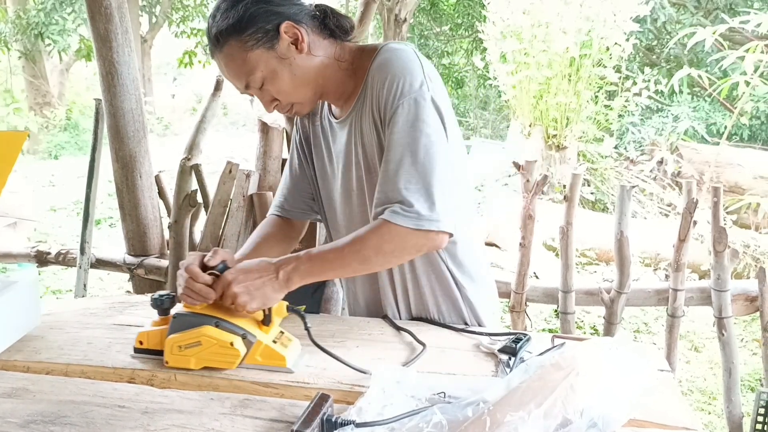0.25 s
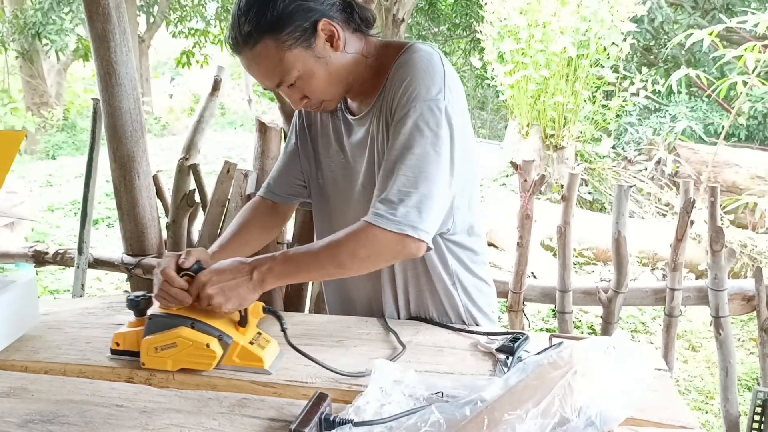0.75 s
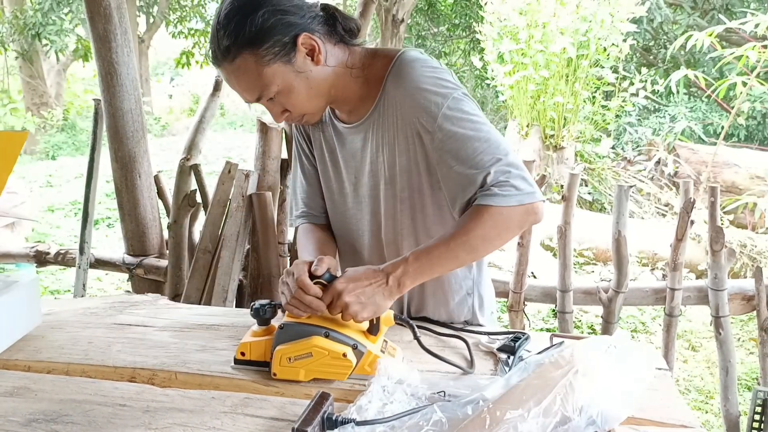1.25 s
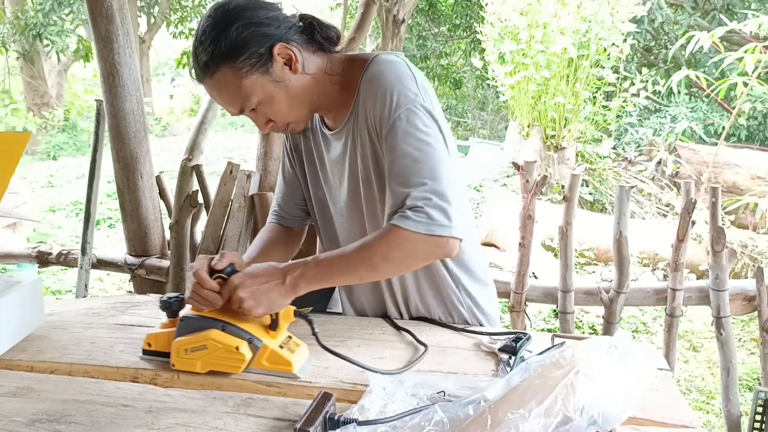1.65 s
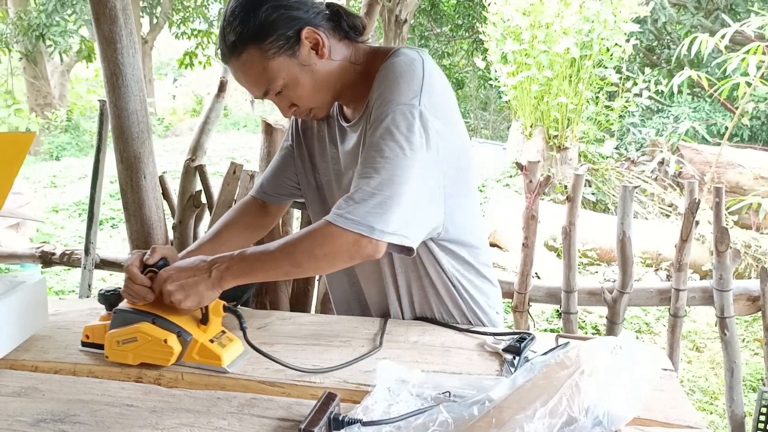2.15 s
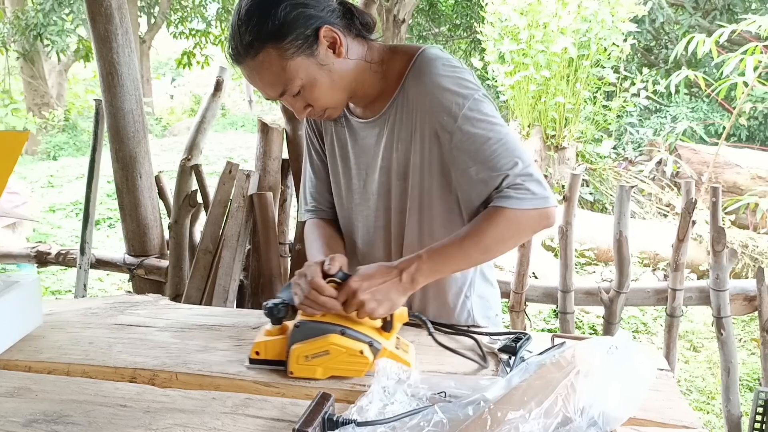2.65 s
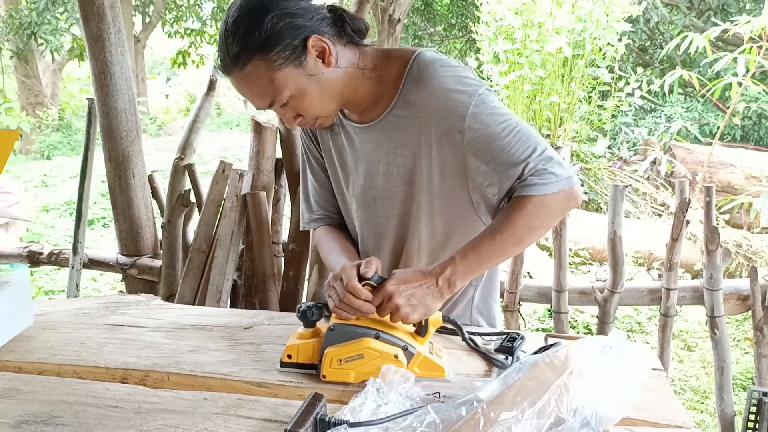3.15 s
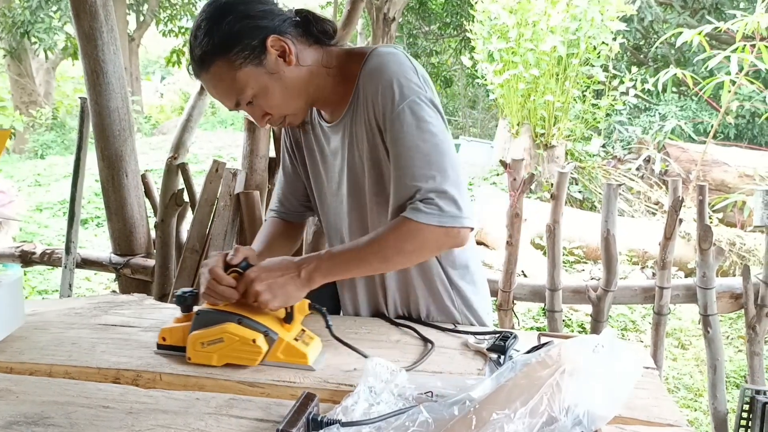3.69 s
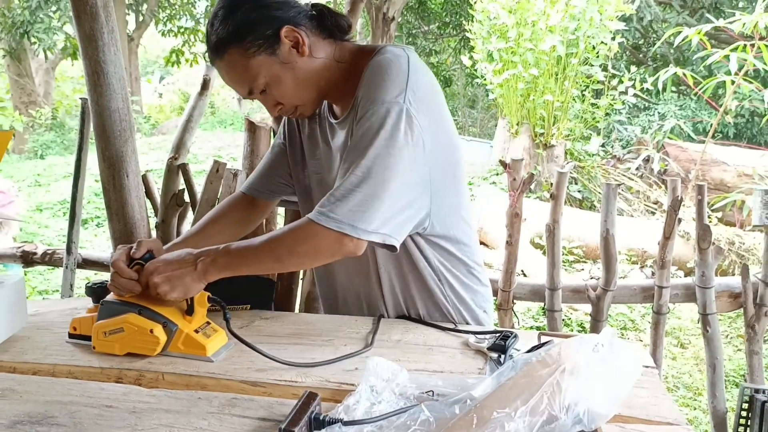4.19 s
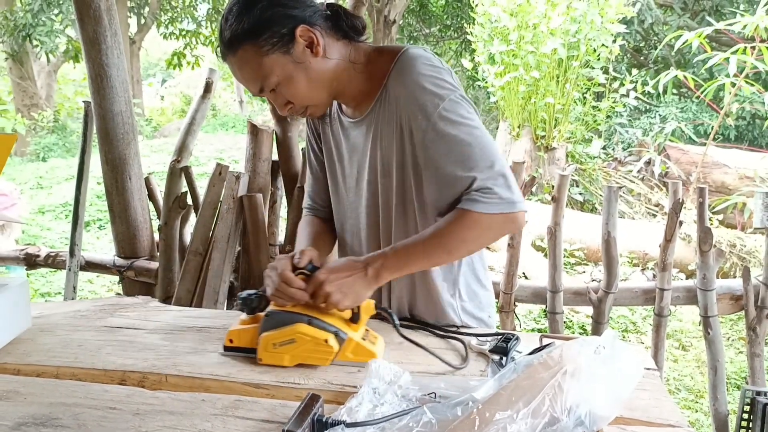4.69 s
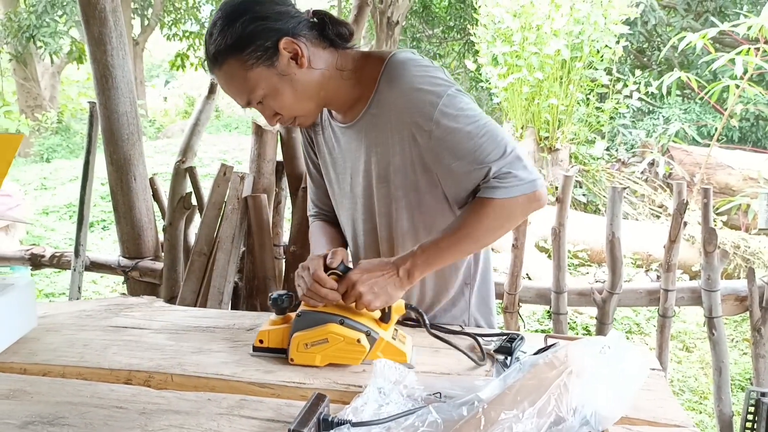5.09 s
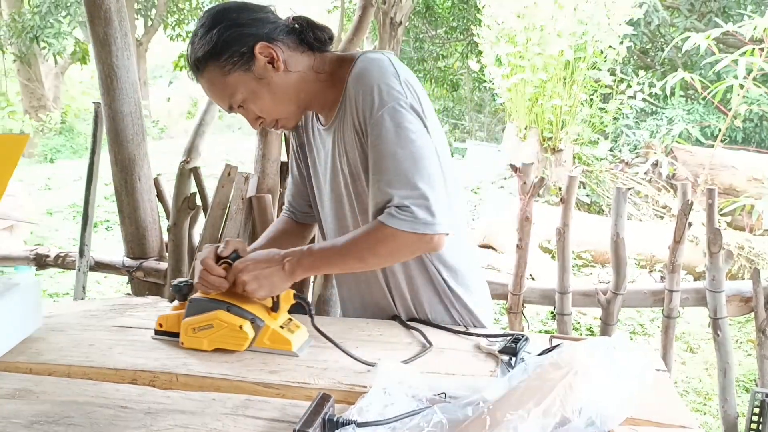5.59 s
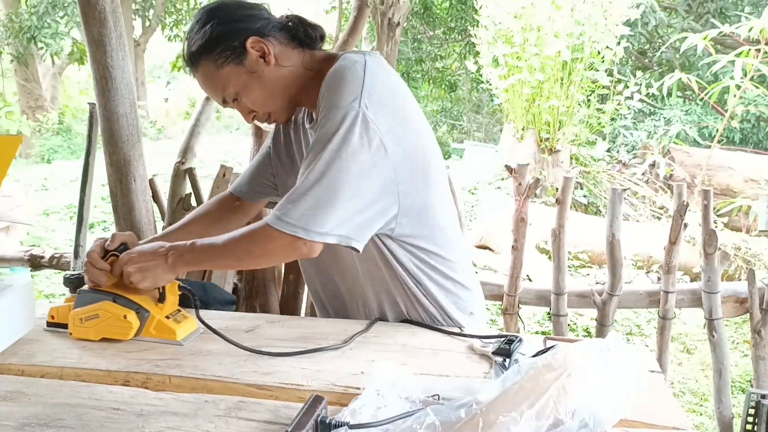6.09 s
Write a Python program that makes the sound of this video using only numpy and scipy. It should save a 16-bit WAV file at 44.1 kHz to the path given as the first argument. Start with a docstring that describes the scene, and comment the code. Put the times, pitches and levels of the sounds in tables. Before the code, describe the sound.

An electric hand planer runs steadily with a loud, high whine and rushing hiss as it slides back and forth over a wooden board.

```python
"""An electric hand planer is already running, pushed to and fro over a thick board under an open shed.
From the start its two-blade drum, faster motor, belt and a rattling part whine at locked speeds over
rushing air and chips. As the strokes go on, shifting echoes make the tones swell and fade, and the
shaken board hums. Just after six seconds the trigger is let go and the pitch starts to drop."""
import sys
import numpy as np
from scipy import signal
from scipy.fft import rfft, irfft
from scipy.io import wavfile
from scipy.ndimage import uniform_filter1d

SR = 44100
rng = np.random.default_rng(int(sys.argv[2]) if len(sys.argv) > 2 else 0)


def output_pcm(signal):
    """Save a mono or channel-first signal as 16-bit PCM at the path in sys.argv[1].

    Samples are clipped to [-1, 1] before scaling.
    """
    pcm = np.clip(np.atleast_2d(signal).T, -1, 1) * 32767
    wavfile.write(sys.argv[1], SR, np.round(pcm).astype(np.int16))


N = 279373
MOTOR_RATIO, RATTLE_RATIO, BELT_RATIO = 1.7864, .9818, .5201  # turns for each turn of the drum


def gain_of(db):
    """Turns decibels into a number to multiply by."""
    return 10 ** (np.asarray(db) / 20)


def evened(x):
    """Scales a signal to an average power of 1."""
    return x / np.sqrt(np.mean(abs(x) ** 2) + 1e-20)


def curves(rows, t):
    """Reads a table's columns at times t; the first column holds the times."""
    times, *columns = np.transpose(rows)
    return [np.interp(t, times, column) for column in columns]


def flutter(hz, count):
    """Random complex wobbles, mostly slower than hz, with one value every 32 samples."""
    steps = N // 32 + 2
    noise = rng.standard_normal((count, steps)) + 1j * rng.standard_normal((count, steps))
    rates = np.fft.fftfreq(steps, 32 / SR)
    wobbles = np.fft.ifft(np.fft.fft(noise) / (1 + abs(rates / hz) ** 3))
    return np.array([evened(row) for row in wobbles])


def tones(turns, orders, levels_db, fade, fade_hz, blur, blur_hz):
    """Tones that echoes fade and shaking parts blur. An order is a number of waves per turn."""
    fade = np.clip(fade * np.sqrt(orders / 8), 0, 1)[:, None]  # short waves fade more
    slow, quick = flutter(fade_hz, len(orders)), flutter(blur_hz, len(orders))
    shapes = np.sqrt(1 - fade ** 2) + fade * slow + blur * quick
    steps, out = np.arange(N) / 32, np.zeros(N)
    for order, db, shape in zip(orders, levels_db, shapes):
        size = np.interp(steps, np.arange(len(shape)), shape) * np.exp(2j * np.pi * rng.random())
        angle = 2 * np.pi * (order * turns % 1)
        out += np.sqrt(2) * gain_of(db) * (size * np.exp(1j * angle)).real
    return out


# The hum's low notes; the loudest, at 285.6 Hz, comes from the rattling part's turning. Each row: pitch in Hz,
# width in Hz, relative level in dB.
HUM_NOTES = [(156, 6.6, -30), (225.6, 18, -8.5), (285.6, 12, 5)]
# Brief swells of the hum. Each row: start in seconds, length in seconds, level in dB.
HUM_SWELLS = [(0.04, 0.091, -31), (0.206, 0.065, -33), (0.337, 0.19, -34), (0.682, 0.034, -30),
              (1.122, 0.056, -33), (1.4, 0.22, -31.5), (1.695, 0.032, -41), (1.829, 0.12, -33),
              (3.611, 0.052, -34), (3.712, 0.16, -33), (3.932, 0.18, -33), (4.41, 0.048, -37),
              (5.706, 0.051, -34), (6.05, 0.14, -34)]

def board_hum(t):
    """The shaken board rings at its low notes, joined by the rattling part's low tone, and swells now and then."""
    hz = np.fft.rfftfreq(N, 1 / SR)
    peaks = sum(gain_of(db) / (1 + (2 * (hz - pitch) / width) ** 2) for pitch, width, db in HUM_NOTES)
    hum = evened(irfft(rfft(rng.standard_normal(N)) * peaks, N))
    lumps = evened(flutter(hz=7.8, count=1)[0].real)
    level = gain_of(-45.5 + 0.5 * np.interp(t * SR / 32, np.arange(len(lumps)), lumps))
    for start, length, db in HUM_SWELLS:
        level += gain_of(db) * np.exp(-(2 * (t - start) / length - 1) ** 2)
    return level * hum


# The colour of the rushing air. Each row: frequency in Hz, level in dB per Hz.
RUSH_COLOUR = [(70, -108), (200, -74), (420, -62), (1250, -60), (1700, -55.5), (2900, -52), (3300, -54),
               (4200, -54.5), (4800, -59.5), (6300, -60), (7200, -72), (11000, -83), (13800, -79),
               (14800, -69)]
# Where the rush's middle, upper and top bands lie, in Hz.
BAND_HZ = [3260, 5000, 13000]
# Each row: time in seconds, then the three bands in dB. Only swings around a band's average count.
BAND_SWINGS = [(0.0, -21, -24, -46), (0.02, -18, -22.5, -38), (0.79, -23, -25, -41),
               (1.18, -18.5, -22.5, -38), (1.62, -19.5, -22.5, -40), (1.89, -23.5, -23.5, -41),
               (2.31, -21.5, -26.5, -39.5), (2.75, -19, -21, -39), (3.0, -20, -23, -41),
               (3.21, -23, -25, -43), (3.45, -19.5, -22.5, -38), (3.68, -19, -22, -38.5),
               (3.97, -21, -26, -38.5), (4.42, -21.5, -27, -37), (4.44, -22, -26.5, -40),
               (5.2, -20, -23.5, -38), (5.55, -22, -25, -40), (6.08, -21, -24.5, -35),
               (6.29, -20, -25.5, -36), (6.33, -14, -22, -33)]

def air_rush(turns):
    """Air and chips hiss in drifting patches, lightly chopped by each motor turn and each rattle."""
    frames, hz = N // 256 + 5, np.fft.rfftfreq(1024, 1 / SR)
    real, imag, patches = rng.standard_normal((frames, 513, 3)).T
    patches = evened(uniform_filter1d(uniform_filter1d(patches, 14, 0), 12, 1))
    gusts = evened(uniform_filter1d(rng.standard_normal(frames), 6))
    bands_db = np.array(curves(BAND_SWINGS, np.arange(frames) * 256 / SR))
    blend = np.transpose([np.interp(hz, BAND_HZ, row) for row in np.eye(len(BAND_HZ))])
    swing_db = blend @ (bands_db - bands_db.mean(axis=1, keepdims=True))
    point_hz, point_db = np.transpose(RUSH_COLOUR)
    colour_db = np.interp(np.log(hz + 1), np.log(point_hz), point_db)[:, None]
    spectrum = (real + 1j * imag) * gain_of(colour_db + swing_db + 1.9 * patches + 0.6 * gusts)
    noise = evened(signal.istft(spectrum, nperseg=1024, noverlap=768)[1][:N])
    level = np.sqrt(np.sum(gain_of(colour_db) ** 2) * hz[1])
    angle = 2 * np.pi * turns
    chop = 1 + 0.047 * np.cos(MOTOR_RATIO * angle) + 0.15 * np.cos(RATTLE_RATIO * angle)
    return level * noise * chop


# The belt's tones in waves per lap, then their levels in dB.
BELT_ORDERS = [1, 2, 5, 8, 10, 12, 13]
BELT_DB = [-66, -48, -44, -48, -42, -44, -34]

def belt_whine(turns):
    """The belt's sound repeats with every lap of its loop."""
    orders = BELT_RATIO * np.array(BELT_ORDERS)
    return tones(turns, orders, BELT_DB, fade=0.27, fade_hz=2.6, blur=0.14, blur_hz=31)


# The shaking tones, along with some plain drum, blade and motor tones. Each row: motor order, drum order. Then
# their levels in dB.
SHAKE_ORDERS = [(1, -1), (0, 1), (2, -1), (1, 1), (3, -2), (1, 2), (3, -1), (4, -2), (2, 2), (4, -1),
                (3, 1), (3, 2), (5, -1), (4, 1), (6, -2), (5, 0), (4, 2), (5, 1), (6, 0), (5, 2), (6, 1),
                (7, 0), (0, 16), (11, 0), (0, 20), (0, 22), (0, 24), (23, 0), (24, 0), (7, -3), (5, -2),
                (0, 3), (6, -1), (8, 0), (13, 0), (0, 30), (0, 32), (0, 38)]
SHAKE_DB = [-52, -48, -36, -35, -37, -44, -41, -41, -37, -41, -31.5, -40, -41, -31.5, -36, -31.5, -34, -33,
            -32.5, -37, -36, -36, -35, -41, -39, -42.5, -52.5, -65, -56, -41, -40, -48, -41, -41, -52, -59,
            -61, -69]

def shaking(turns):
    """Motor and drum shake each other, making tones at sums of their orders; plain higher blade and motor tones
    sound alongside."""
    orders = np.dot(SHAKE_ORDERS, [MOTOR_RATIO, 1])
    return tones(turns, orders, SHAKE_DB, fade=0.9, fade_hz=3.5, blur=0.21, blur_hz=21)


def housing_whine(turns):
    """More sums of motor and drum orders sound faintly where the housing rings easily."""
    pairs = [(motor, drum) for motor in range(2, 10) for drum in range(-4, 5)
             if drum and (motor, drum) not in SHAKE_ORDERS]
    orders = np.dot(pairs, [MOTOR_RATIO, 1])
    orders = orders[(orders > 5) & (orders < 16)]
    levels_db = -45 + 2.1 * rng.standard_normal(len(orders))
    return tones(turns, orders, levels_db, fade=0.39, fade_hz=2.3, blur=0.12, blur_hz=15)


# The rattle's tones. Each row: motor order, rattling part's order. Then their levels in dB.
RATTLE_ORDERS = [(4, -1), (3, 2), (4, 1), (4, 2), (5, 1), (5, 2), (6, 1), (5, 3), (6, 2), (7, 1), (7, 2),
                 (8, 1), (7, 3), (8, 2), (9, 2), (4, 3), (10, 2)]
RATTLE_DB = [-39, -40, -34, -36, -31, -32, -32, -36, -36, -31.5, -32, -40, -41, -42, -43, -36, -47]

def rattle(turns):
    """A part turning just slower than the drum beats with the motor."""
    orders = np.dot(RATTLE_ORDERS, [MOTOR_RATIO, RATTLE_RATIO])
    return tones(turns, orders, RATTLE_DB, fade=0.87, fade_hz=2.8, blur=0.064, blur_hz=19)


# How fast the drum spins. Each row: time in seconds, turns per second.
DRUM_SPEED = [(0, 290.5), (.42, 290.8), (.98, 290.8), (1.54, 290.9), (2.1, 291.2), (2.66, 291.2),
              (3.22, 291.1), (3.78, 291.2), (4.34, 291.6), (4.9, 291.6), (5.46, 291.4), (6.21, 292.0),
              (6.33, 279.5)]

def drum_speed(t):
    """The drum spins almost steadily until the trigger is let go."""
    return curves(DRUM_SPEED, t)[0]


# The strokes. Each row: time in seconds, place along the board in metres, then the extra metres
# travelled by each of five echoes off the shed, table and worker.
STROKES = [(0.0, 0.06, 0.919, 1.973, 0.925, 0.722, 0.907), (0.25, -0.06, 0.858, 1.955, 0.871, 0.776, 0.799),
           (0.5, -0.18, 0.933, 2.029, 0.856, 0.74, 0.742), (0.75, -0.17, 0.955, 2.065, 0.816, 0.75, 0.754),
           (1.0, 0.06, 0.888, 1.936, 0.793, 0.86, 0.866), (1.25, 0.12, 0.867, 1.853, 0.81, 0.818, 0.833),
           (1.5, 0.03, 0.899, 1.881, 0.827, 0.804, 0.822), (1.75, -0.11, 0.903, 1.914, 0.838, 0.72, 0.739),
           (2.0, -0.21, 0.957, 2.069, 0.848, 0.765, 0.771), (2.25, -0.14, 0.95, 2.086, 0.834, 0.772, 0.794),
           (2.5, 0.05, 0.904, 1.967, 0.861, 0.828, 0.809), (2.75, 0.21, 0.851, 1.844, 0.872, 0.867, 0.839),
           (3.0, 0.27, 0.889, 1.524, 0.84, 0.906, 0.903), (3.25, 0.2, 0.845, 1.897, 0.851, 0.757, 0.793),
           (3.5, 0.07, 0.958, 1.847, 0.865, 0.734, 0.857), (3.75, -0.05, 0.902, 1.87, 0.747, 0.789, 0.785),
           (4.0, -0.18, 0.915, 2.031, 0.796, 0.739, 0.745), (4.25, -0.2, 0.972, 2.147, 0.757, 0.711, 0.708),
           (4.5, -0.05, 0.944, 2.059, 0.728, 0.621, 0.632), (4.75, 0.13, 0.886, 1.957, 0.763, 0.737, 0.785),
           (5.0, 0.18, 0.968, 1.862, 0.772, 0.638, 0.734), (5.25, 0.1, 0.951, 1.908, 0.773, 0.658, 0.758),
           (5.5, -0.01, 0.892, 1.987, 0.705, 0.598, 0.764),
           (5.75, -0.11, 0.963, 2.051, 0.623, 0.586, 0.771),
           (6.0, -0.24, 1.044, 2.161, 0.686, 0.573, 0.703), (6.25, -0.26, 1.004, 2.14, 0.609, 0.643, 0.639)]

def stroke_levels(rows, orders, t):
    """Each tone's level in dB as the tool moves and its echoes add to it or cancel it."""
    rounding = round(0.2 * SR)  # smooths the strokes
    place, *paths = [uniform_filter1d(c, rounding, mode="nearest")[::64] for c in curves(STROKES, t)]
    waves_per_m = orders * np.mean(drum_speed(t)) / 343  # sound travels 343 metres a second
    levels_db = []
    for (db, db_per_m, *shares), waves in zip(rows, waves_per_m):
        with_echoes = 1 + np.dot(shares, np.exp(2j * np.pi * waves * np.array(paths)))
        echo_db = 10 * np.log10(abs(with_echoes) ** 2 + 1e-3)
        levels_db.append(np.interp(t, t[::64], db + db_per_m * place + echo_db))
    return levels_db


# The motor's loud tones. Each row: motor order (12 is the cooling fan), drum order, rattle order.
MOTOR_ORDERS = [(1, 0, 0), (2, 0, 0), (3, 0, 0), (4, 0, 0), (12, 0, 0), (2, 1, 0), (3, 0, 1)]
# Each row: one tone's level in dB before echoes, change in dB per metre along the board,
# then the strength of each of the five echoes (minus flips the wave).
MOTOR_LEVELS = [(-21, -5.5, 0.4, -0.23, -0.38, 0.015, 0.3), (-27, -23, -0.68, 0.33, 0.18, -0.083, 0.17),
                (-27.5, -4.0, -0.6, -0.15, 0.28, 0.23, 0.11), (-32, 1, -0.36, -0.073, -0.14, -0.11, 0.14),
                (-37, 9, 0.039, -0.16, -0.096, -0.14, 0.41), (-26.5, 19, 0.41, -0.53, -0.092, 0.16, -0.21),
                (-26.9, 27, -0.33, 0.11, 0.13, 0.42, -0.012)]

def motor_whine(turns, t):
    """The motor and its fan whine as they spin faster than the drum."""
    orders = np.dot(MOTOR_ORDERS, [MOTOR_RATIO, 1, RATTLE_RATIO])
    levels_db = stroke_levels(MOTOR_LEVELS, orders, t)
    return tones(turns, orders, levels_db, fade=0.35, fade_hz=13, blur=0.03, blur_hz=19)


# The blades' tones, in waves per passing blade.
BLADE_HARMONICS = [1, 2, 3, 4, 5, 6, 7, 9]
# Each row: one tone's level in dB before echoes, change in dB per metre, five echo strengths.
BLADE_LEVELS = [(-23.5, -5.0, -0.26, 0.28, -0.039, -0.072, -0.048),
                (-30, 26, -0.4, -0.1, 0.2, 0.017, -0.09), (-21, -11, -0.037, -0.47, -0.15, -0.34, 0.0023),
                (-20, -9, 0.075, -0.17, 0.16, -0.39, 0.6), (-25, -11.5, 0.07, -0.51, 0.89, 0.42, 0.37),
                (-24.5, -5.5, -0.29, 0.43, 0.59, -0.8, 1), (-28.5, -10.0, -0.75, 0.49, -0.068, -0.38, 0.02),
                (-32, 14, 0.019, 0.099, -0.3, 0.06, 0.2)]

def blade_whine(turns, t):
    """Two blades sweep past on every turn of the drum, making the main whine."""
    orders = 2 * np.array(BLADE_HARMONICS)
    levels_db = stroke_levels(BLADE_LEVELS, orders, t)
    return tones(turns, orders, levels_db, fade=0.15, fade_hz=13.5, blur=0.069, blur_hz=13)


def scene():
    """The planer's tones all follow the drum's turns, over the air and the board."""
    t = np.arange(N) / SR
    turns = np.cumsum(drum_speed(t)) / SR
    loud = blade_whine(turns, t) + motor_whine(turns, t)
    soft = shaking(turns) + rattle(turns) + belt_whine(turns) + housing_whine(turns)
    return (loud + soft + air_rush(turns) + board_hum(t))[None]


def record(dry):
    """The microphone drops the bass, clips the tallest peaks and cuts the highest treble."""
    bass_cut_hz, treble_cut_hz = 135, 15780
    thin = signal.sosfilt(signal.butter(3, bass_cut_hz, "high", fs=SR, output="sos"), dry)
    clipped = np.clip(thin, -.955, .955)
    treble_cut = signal.firwin(1023, treble_cut_hz, window=("kaiser", 9), fs=SR)
    return signal.oaconvolve(clipped, treble_cut[None], "same")


dry = scene()
out = record(dry)
output_pcm(out)
```